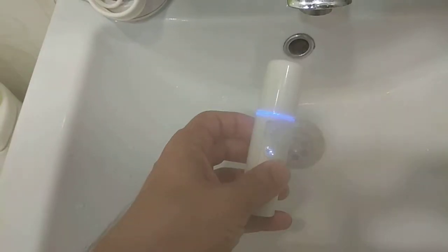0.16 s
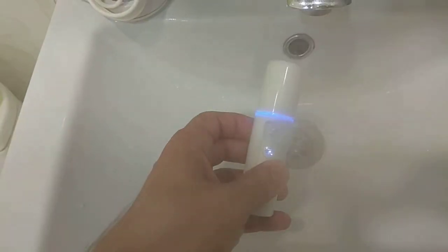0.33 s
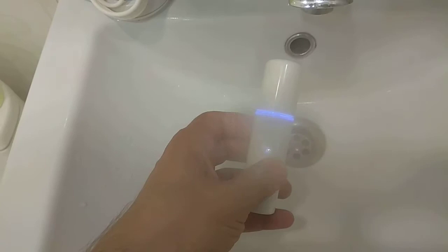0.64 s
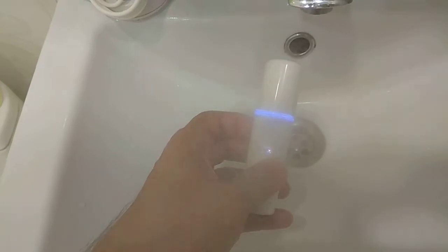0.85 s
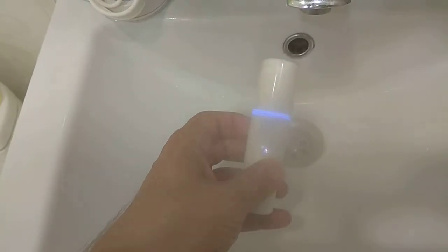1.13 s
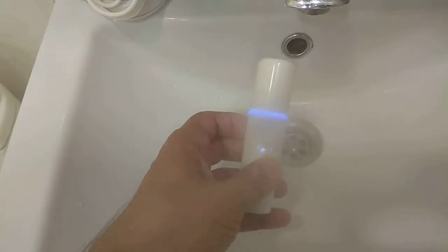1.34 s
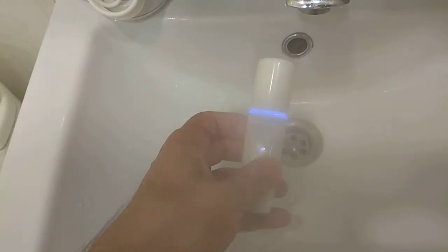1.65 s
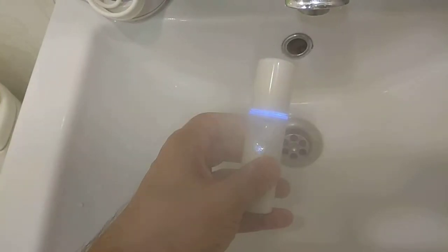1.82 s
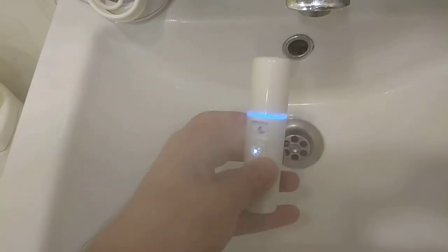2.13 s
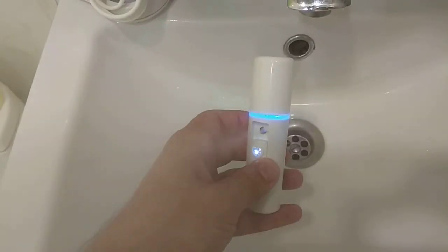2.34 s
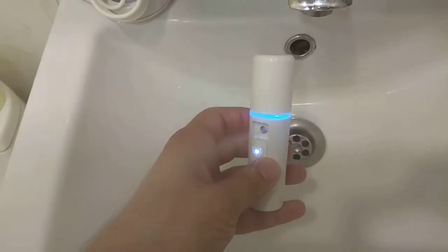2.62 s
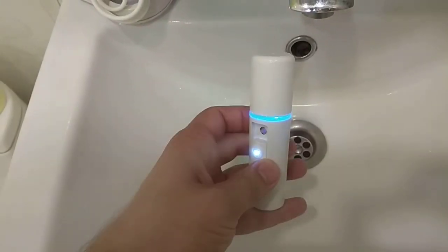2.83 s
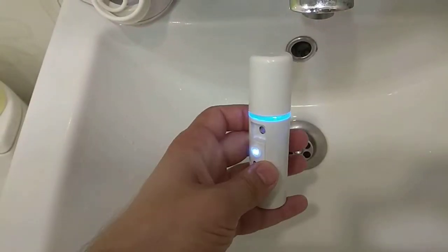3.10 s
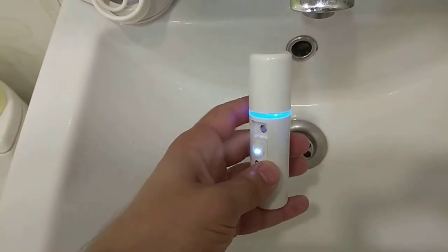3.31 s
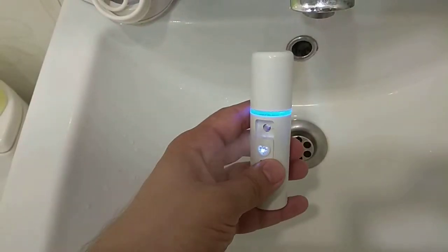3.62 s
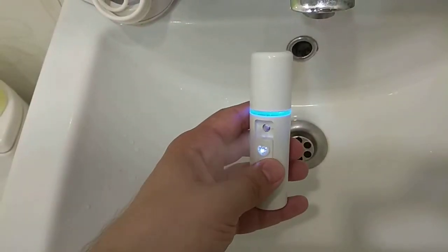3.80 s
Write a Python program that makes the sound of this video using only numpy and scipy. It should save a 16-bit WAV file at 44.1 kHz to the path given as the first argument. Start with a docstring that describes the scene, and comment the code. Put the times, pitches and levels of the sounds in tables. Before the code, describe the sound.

A small handheld mister sprays a steady, thin, high hiss over a bathroom sink, wavering then growing stronger midway; soft low handling thumps on the left, faint room hum, close stereo microphone.

```python
"""A small handheld mister hisses over a bathroom basin, close to a two-port microphone.
The hiss is coloured noise: three humps between 7 and 11 kHz swell and fade as the hand turns; air above and below
is steadier. Short echoes ripple it, and for a while a narrow dip slides down through it.
Below lie a soft hum near 200 Hz, room tone and a low rush of air, all shaped from noise.
Rumble and short thumps of handling, made from filtered noise and sagging cosines, are mostly on the left port."""
import sys
import numpy as np
from scipy import signal
from scipy.fft import rfft, irfft
from scipy.io import wavfile

SR = 44100
rng = np.random.default_rng(int(sys.argv[2]) if len(sys.argv) > 2 else 0)


def elevation(decibels):
    """Turn decibel levels (scalar or array-like) into linear amplitude ratios."""
    levels = np.asarray(decibels, float)
    return 10 ** (levels / 20)


def materialize(psi):
    """Save the field psi as 16-bit PCM at rate SR to the path in sys.argv[1].

    A 1-D psi becomes a single channel; in a 2-D psi each row is a channel.
    """
    bounded = np.clip(np.atleast_2d(psi).T, -1, 1)
    quanta = np.round(bounded * 32767).astype(np.int16)
    wavfile.write(sys.argv[1], SR, quanta)


N = 174636


def rms_one(x):
    """Scale a sound to an average (rms) strength of 1."""
    return x / np.sqrt(np.mean(x ** 2) + 1e-20)


def in_time(rows):
    """Draw each column of a table as a curve, by straight lines between the times in its first column."""
    s, *columns = np.transpose(rows)
    return [np.interp(np.arange(N) / SR, s, c) for c in columns]


def bins():
    """Frequencies of the spectrum in Hz, lifted slightly so that none is zero."""
    return np.arange(N // 2 + 1) * SR / N + 1e-3


def shape(points):
    """Turn (Hz, dB) points into a gain for every frequency; outside the points it is silent."""
    hz, db = np.transpose(points)
    return elevation(np.interp(np.log(bins()), np.log(hz), db, left=-200, right=-200))


def drift(rate_hz):
    """Slow random wandering with rms 1: noise smoothed twice, computed at every 40th sample."""
    step = 40
    r = np.exp(-2 * np.pi * rate_hz * step / SR)
    noise = rng.standard_normal(N // step + 4002)
    slow = signal.lfilter([1], [1, -2 * r, r * r], noise)[4000:]  # skip the filter's start
    return np.interp(np.arange(N) / step, np.arange(len(slow)), rms_one(slow))


def two_ports(gain, alike, lag_s):
    """Coloured noise at both ports: part is shared and later on the left, part is each port's own."""
    common, left, right = rfft(rng.standard_normal((3, N)), axis=1)
    share = np.clip(alike, 0, 1)
    late = np.exp(-2j * np.pi * bins() * lag_s)
    shared = np.sqrt(share) * np.array([common * late, common])
    own = np.sqrt(1 - share) * np.array([left, right])
    pair = irfft(gain * (shared + own), N, axis=1)
    return pair / np.std(pair.mean(axis=0))  # the mean of both ports gets rms 1


def mist():
    """Spray hiss: each hump or band of noise follows its own level and flickers a little on its own."""
    # humps of the hiss: centre_hz, width_hz, left_lag_s
    humps = [(8050, 482, 0.000088), (8887, 290, 0.000077), (9955, 474, 0.000081)]
    # their levels and left-minus-right balances:
    # start_s, level1_db, level2_db, level3_db, balance1_db, balance2_db, balance3_db
    hump_levels = [(0.0, -57.5, -58, -62, -10, 4, 0), (0.11, -60.5, -67.5, -50.5, 4, -15, -11.5),
                   (0.29, -57.5, -52.5, -55.5, 6, -10, -17), (0.43, -56.5, -55.5, -59, -1, -9.5, -12),
                   (0.65, -62.5, -56, -50, 2, -9, -9.5), (0.93, -58.5, -58, -60, 3.5, -8, 1),
                   (0.97, -60.5, -57, -57, -3, -9, -9), (1.15, -59, -62, -54.5, 1, -4, -9),
                   (1.46, -71, -60.5, -52.5, 13, -2, -12.5), (1.51, -53, -50, -49, -0.5, -3.5, -12.5),
                   (1.74, -47.5, -50, -54.5, 1, -8.5, -13.5), (1.93, -47, -51.5, -59.5, -0.5, -5, -13),
                   (2.04, -47.5, -52, -49.5, -2.5, -6, -7), (2.29, -50.5, -52, -53.5, 0, 2, -7),
                   (2.34, -53.5, -53, -52, -2.5, 0, -6), (3.07, -58, -63, -57, -4, 2, 2.5),
                   (3.11, -67, -60.5, -57, 8, -4, -2.0), (3.16, -58, -60.5, -56, -1, -1.0, -1),
                   (3.88, -68, -60, -51, 6, -5, -1.5), (3.96, -71, -74, -63, -4, -5, 10)]
    # treble: start_s, level_11_to_13_5_khz_db, level_13_5_to_16_khz_db, left_minus_right_near_11_5_khz_db
    treble_levels = [(0.0, -53, -55, -4), (0.23, -58, -56.5, 0), (0.78, -60, -54.5, 0.0),
                     (1.06, -56, -57.5, -1), (1.64, -59.5, -50, 0), (1.83, -62, -51.5, 0),
                     (2.14, -58.5, -53.5, 0), (2.22, -58.5, -51, -1.5), (3.5, -58, -54.5, -4.5),
                     (3.91, -58.5, -48.5, -8), (3.96, -56, -59, -3)]
    # tone of the two treble bands: frequency_hz, relative_level_per_hz_db
    upper_shape = [(10200, -37), (10700, 2), (11400, 5), (12000, -6), (12600, -2), (13150, -2), (13700, 1),
                   (14100, -19)]
    top_shape = [(13200, -30), (13900, -3), (14500, 0), (15400, 0), (16500, -1)]
    # tone of the lower hiss before and after the hand has turned: frequency_hz, relative_level_per_hz_db
    lower_shape = [(1900, -54), (2600, -27), (3100, -8), (3800, -14), (4400, -3), (5300, -0.5),
                   (5900, -3.5), (6400, 1), (6900, -1), (7500, 7.5), (8200, -20.5)]
    lower_late_shape = [(1900, -41), (2600, -23.5), (3100, -12.5), (3800, -11.5), (4400, -2.5), (5300, 3.5),
                        (5850, -3), (6400, 5), (6900, 7), (7500, 5), (8200, -36)]
    # broad wash under the humps: frequency_hz, relative_level_per_hz_db
    wash_shape = [(7000, -19.5), (7700, -7.5), (8600, -0.5), (9800, 2), (10600, -6.5), (11200, -37)]
    # level of the wash: start_s, level_db
    wash_level = [(0, -62.5), (1.4, -63), (1.55, -57), (2.3, -60.5), (2.7, -55.5), (3.3, -57.5),
                  (3.96, -53)]
    lower_db, lower_late_db = -65, -64.5
    turn_at_s, turn_takes_s = 1.96, 1
    flicker_db, flicker_hz = 0.7, 12
    likeness = 0.68  # share of the noise power common to both ports
    upper_lag_s, top_lag_s, lower_lag_s = 0.000125, 0.000129, 0.000083

    late = (np.arange(N) / SR - turn_at_s) / turn_takes_s + 0.5
    late = np.clip(late, 1e-3, 1 - 1e-3)
    early_db = lower_db + 10 * np.log10(1 - late)
    late_db = lower_late_db + 10 * np.log10(late)
    upper_db, top_db, upper_balance_db = in_time(treble_levels)
    wash_db, = in_time(wash_level)
    curves = in_time(hump_levels)

    # each layer: gain per frequency, level dB, left-minus-right dB, lag of the left port s
    layers = []
    for k, (hz, width_hz, lag_s) in enumerate(humps):
        bell = np.exp(-((bins() - hz) / width_hz) ** 2 / 2)
        layers.append((bell, curves[k], curves[k + len(humps)], lag_s))
    layers += [(shape(wash_shape), wash_db, -2.5, lower_lag_s),
               (shape(upper_shape), upper_db, upper_balance_db, upper_lag_s),
               (shape(top_shape), top_db, 1.2, top_lag_s),
               (shape(lower_shape), early_db, -0.3, lower_lag_s),
               (shape(lower_late_shape), late_db, -0.5, lower_lag_s)]
    hiss = 0
    for gain, db, balance_db, lag_s in layers:
        noise = two_ports(gain, likeness, lag_s)
        sides_db = balance_db * np.array([[0.5], [-0.5]])
        hiss = hiss + noise * elevation(db + flicker_db * drift(flicker_hz) + sides_db)
    return hiss


def basin(x):
    """Dense short echoes in the basin ripple the spectrum; one random pattern fades into the next."""
    t60_s = 0.09  # time for the echoes to die away by 60 dB
    share = 0.5  # part of the power that goes through the echoes
    change_s = 0.3  # time until the hand has changed their pattern
    t = np.arange(N) / SR / change_s
    tail = np.arange(int(t60_s * SR))
    wet = 0
    for k in range(int(t[-1]) + 2):
        echoes = rng.standard_normal(len(tail)) * elevation(-60 * tail / len(tail))
        echoes = echoes / np.linalg.norm(echoes)
        fade = np.cos(np.pi / 2 * np.clip(t - k, -1, 1))
        wet = wet + fade * signal.fftconvolve(x, echoes[None], axes=1)[:, :N]
    return np.sqrt(1 - share) * x + np.sqrt(share) * wet


def room():
    """Room tone: soft noise, nearly separate at each port, whose level wanders in patches."""
    # tone of the room: frequency_hz, relative_level_per_hz_db
    room_shape = [(30, -40), (80, -17.5), (150, 6.5), (260, -6), (400, -17.5), (800, -10.5), (1500, -11.5),
                  (2500, -12.5), (5000, -50)]
    level_db, patchy_db = -82, 1.8
    patches = np.array([drift(17.0), drift(15.5)])
    return two_ports(shape(room_shape), 0.066, 0) * elevation(level_db + patchy_db * patches)


def hum():
    """A hum made of a very narrow band of noise, with a wavering level."""
    pitch_hz, width_hz, level_db, waver_db = 200.5, 14.1, -76.5, 1.53
    peak = 1 / (1 + (2 * (bins() - pitch_hz) / width_hz) ** 2)
    return two_ports(peak, 0.97, 0) * elevation(level_db + waver_db * drift(3.2))


def handling():
    """Each thump has a tick just ahead and swings briefly as its pitch sags; lumpy rumble lies beneath."""
    # thumps, levels before the low cut: peak_s (time of the main, downward peak), level_db, pitch_hz,
    # tick_level_db
    thumps = [(0.1606, -41, 181, -80), (0.2558, -44.5, 264, -56.5), (0.4266, -36.5, 240, -50),
              (1.4177, -45, 185, -69), (2.1643, -42.5, 246, -66), (2.5262, -48.5, 195, -82),
              (2.5732, -42, 187, -64), (2.7264, -46, 185, -77), (2.8514, -36.5, 248, -64),
              (2.8696, -42, 258, -56), (3.4864, -59, 159.4, -78), (3.8136, -52.5, 170, -70)]
    rise_cycles, fall_cycles, sag_per_cycle = 0.31, 0.81, 0.22
    tick_hz, tick_lead_s, tick_s = 916, 0.00294, 0.0007
    rumble_hz, rumble_db, lump_db = 112.8, -70.5, 3.3
    low_cut_hz, right_db = 55, -41  # right port relative to the left

    t, out = np.arange(N) / SR, np.zeros(N)
    for s, db, hz, tick_db in thumps:
        near = slice(int((s - 0.02) * SR), int((s + 0.06) * SR))
        cycles = (t[near] - s) * hz
        rise = np.exp(-(cycles / rise_cycles) ** 2 / 2)
        fall = np.exp((0.23 - np.hypot(cycles, 0.3)) / fall_cycles)
        env = np.where(cycles < 0, rise, fall)
        stretch = 1 + sag_per_cycle * np.clip(cycles + 1, 0, 3)
        swing = np.cos(2 * np.pi * cycles / stretch * (1 + sag_per_cycle))
        out[near] -= elevation(db) * env * swing
        from_tick = t[near] - s + tick_lead_s
        burst = np.exp(-(from_tick / tick_s) ** 2 / 2)
        out[near] += elevation(tick_db) * burst * np.cos(2 * np.pi * tick_hz * from_tick)

    band = signal.butter(2, [rumble_hz * 0.77, rumble_hz * 1.9], "band", fs=SR, output="sos")
    rumble = signal.sosfilt(band, rng.standard_normal(N)) * elevation(lump_db * drift(27))
    out = out + elevation(rumble_db) * rms_one(rumble)
    low_cut = signal.butter(1, low_cut_hz, "high", fs=SR, output="sos")
    return signal.sosfilt(low_cut, out) * elevation(np.array([[0], [right_db]]))


def air():
    """A low rush of air: noise that comes and goes, mostly separate at each port."""
    # tone of the rush: frequency_hz, relative_level_per_hz_db
    air_shape = [(250, -18), (350, -3), (500, 0), (700, -5), (950, -12), (1400, -30)]
    # its level: start_s, level_db
    air_level = [(0.0, -105), (0.11, -96), (0.34, -78), (0.45, -78.5), (0.67, -90.5), (1.37, -94.5),
                 (1.58, -85), (2.01, -76.5), (2.51, -88.5), (3.08, -80.5), (3.66, -95), (3.96, -84)]
    db, = in_time(air_level)
    return two_ports(shape(air_shape), 0.2, 0) * elevation(db + 1.8 * drift(8.0))


def sliding_dip(x):
    """A moving band is shifted down to 0 Hz, isolated, shifted back and partly taken out."""
    # path of the dip: start_s, centre_hz, depth (0 to 1)
    dip_path = [(.62, 11600, 0), (.75, 10900, 0.45), (.9, 10000, 0.55), (1.0, 9630, 0.6), (1.2, 8460, .5),
                (1.44, 7800, 0.5), (1.49, 7500, 0.1)]
    width_hz, stray_hz, waver = 800, 220, 0.45
    hz, depth = in_time(dip_path)
    turn = np.exp(2j * np.pi * np.cumsum(hz + stray_hz * drift(12.0)) / SR)
    low_pass = signal.butter(2, width_hz / 2, fs=SR, output="sos")
    slow = signal.sosfiltfilt(low_pass, x / turn, axis=1)
    band = 2 * np.real(slow * turn)
    return x - np.clip(depth * (1 + waver * drift(19.0)), 0, 1) * band


def scene():
    """Mist, room tone and air pass through the basin echoes; hum and handling are added dry."""
    return basin(sliding_dip(mist()) + room() + air()) + hum() + handling()


def top_cut(x):
    """Nothing passes above the cut-off."""
    return signal.sosfilt(signal.butter(12, 16800, fs=SR, output="sos"), x)


def record(dry):
    """Everything from 15760 Hz up is cut away steeply in the finished mix."""
    cut = irfft(rfft(dry, axis=1) * (bins() < 15760), N, axis=1)
    return top_cut(cut)


dry = scene()
out = record(dry)
materialize(out)
```